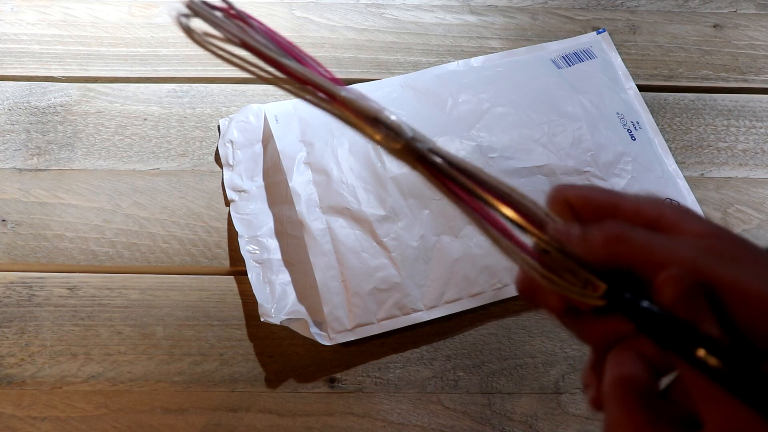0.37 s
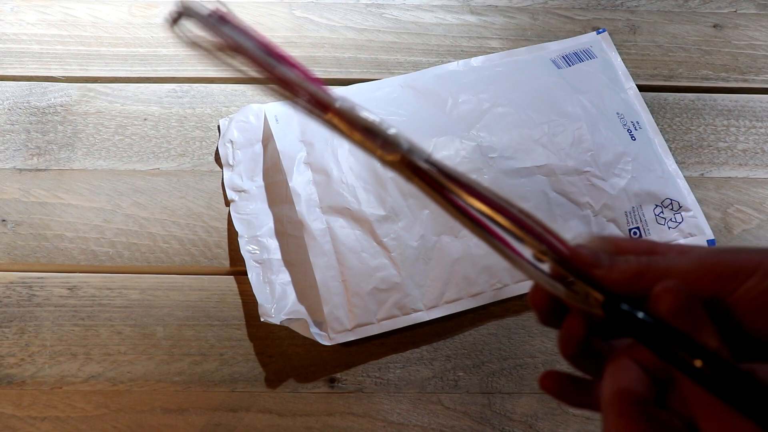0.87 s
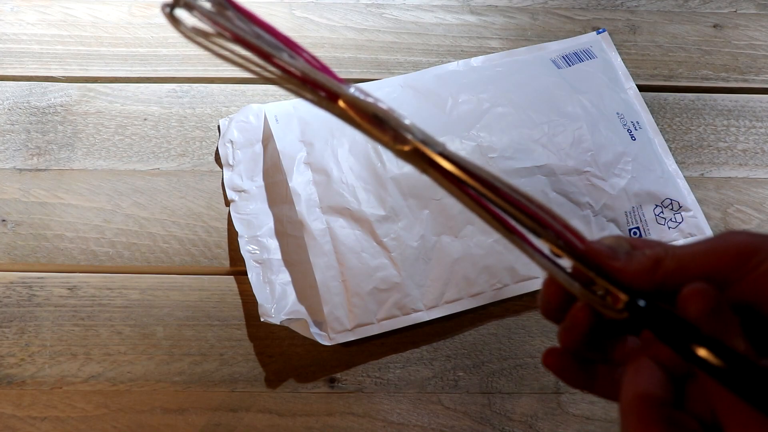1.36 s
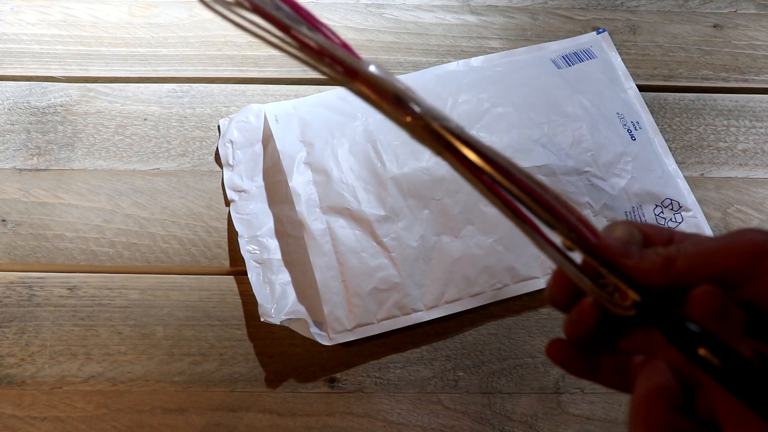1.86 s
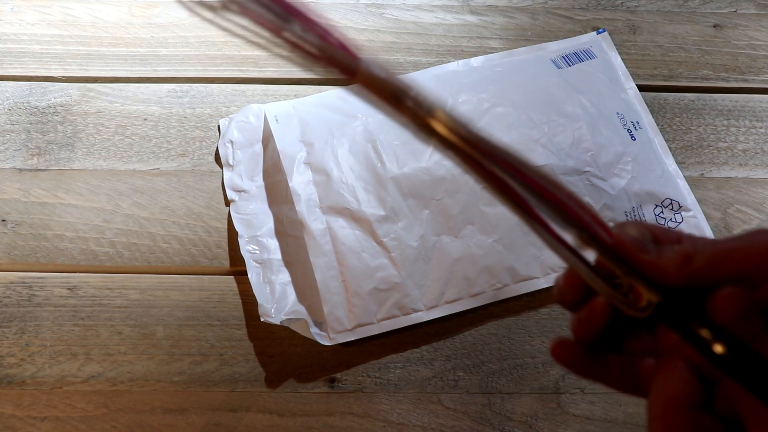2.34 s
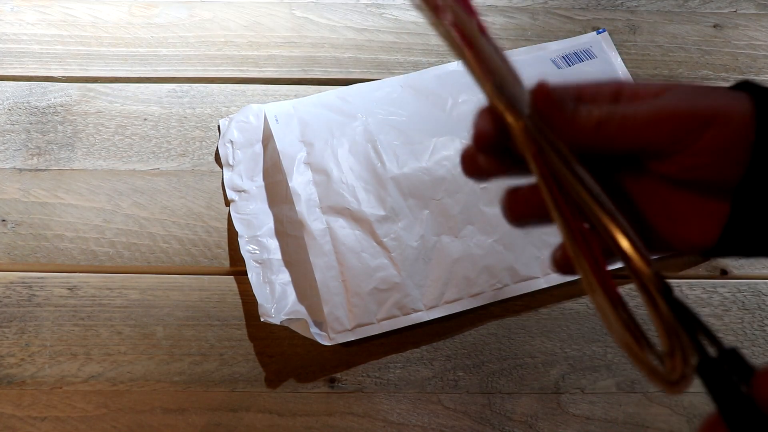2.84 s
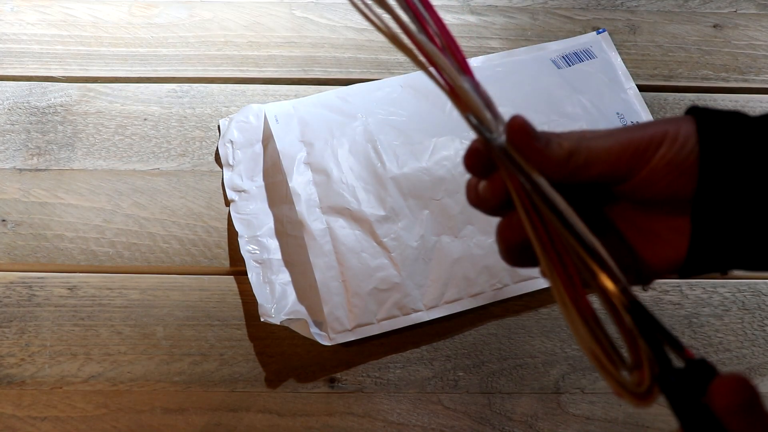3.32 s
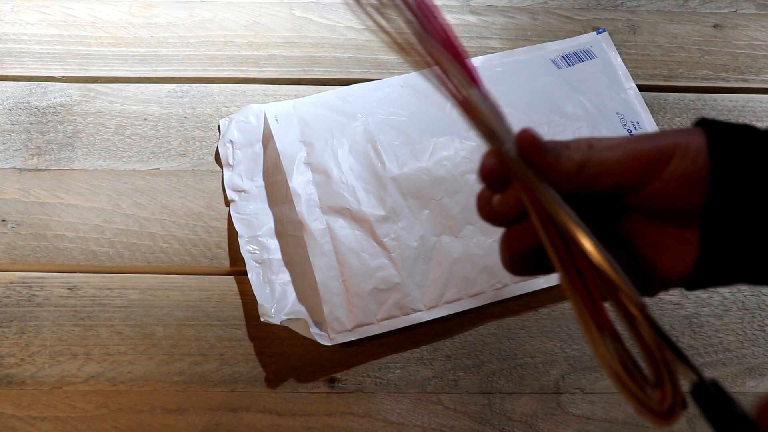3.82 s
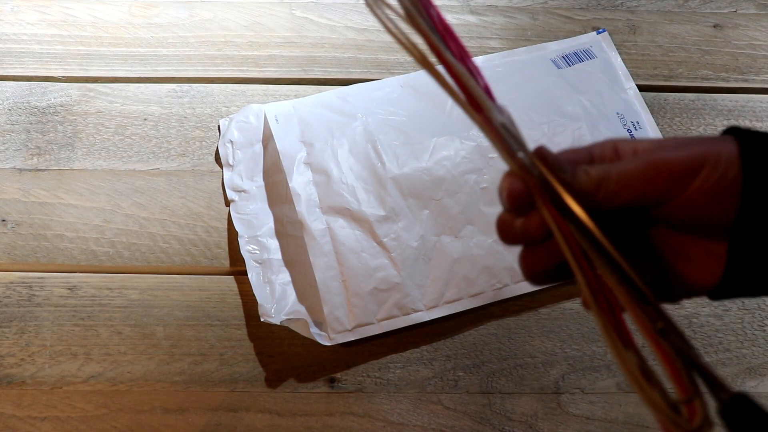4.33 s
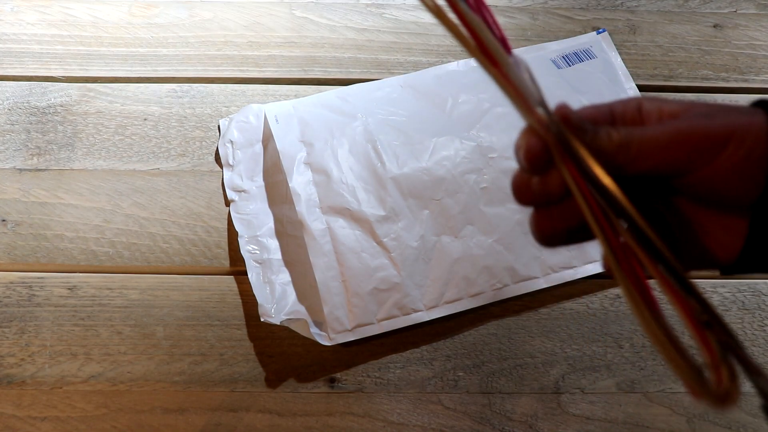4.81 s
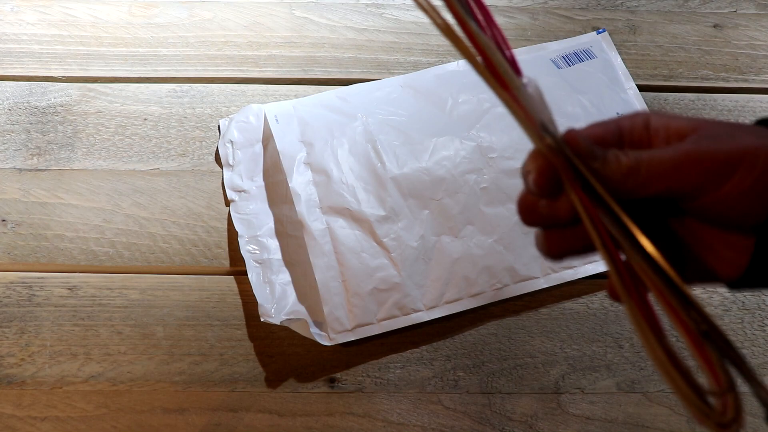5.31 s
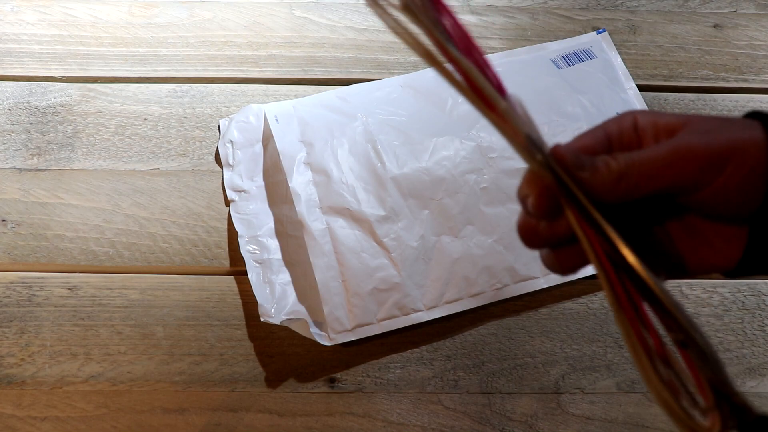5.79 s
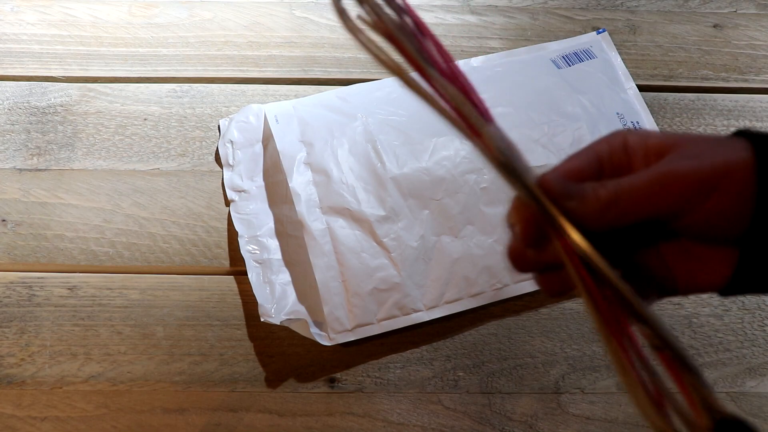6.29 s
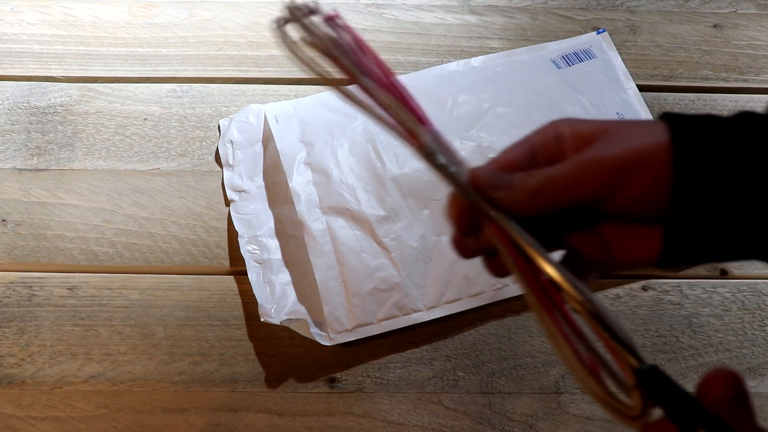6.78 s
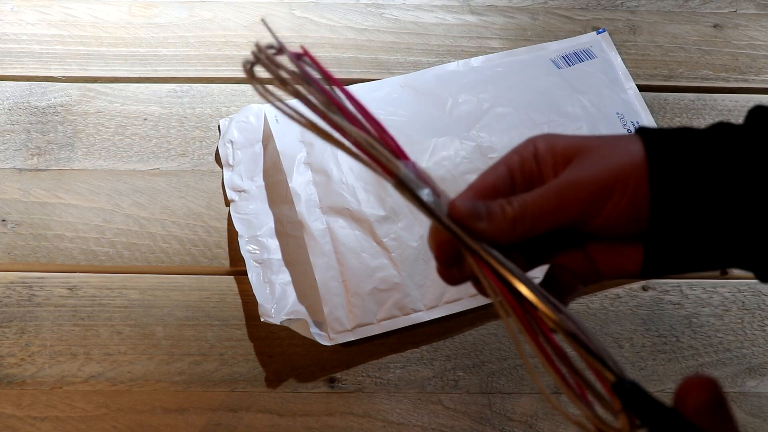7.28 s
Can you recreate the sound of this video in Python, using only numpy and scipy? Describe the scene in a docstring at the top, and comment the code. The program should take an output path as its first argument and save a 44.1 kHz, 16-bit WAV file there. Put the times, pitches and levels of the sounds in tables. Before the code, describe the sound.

Fingers pick and peel sticky tape from a cord bundle up close, with irregular crisp snaps, ticks and fine crackling over faint room hum.

```python
"""Fingers pick at adhesive tape round a bundle of cord on a wooden table, close to a camera.
A low unsteady hum and room rumble (tone and shaped noise) run throughout. From the start slow pulls swell
a fine crackle of film and skin (clumped random slips); fingertips slide softly (resonant noise swells).
Then the glue lets go in snaps and short tears (slip volleys ringing film and cord), and the cord knocks;
a small room answers (decaying noise). Near the end the camera's support is bumped (decaying low sines)."""
import sys
import numpy as np
from scipy import signal
from scipy.fft import rfft, irfft, next_fast_len
from scipy.io import wavfile
from scipy.ndimage import map_coordinates

SR = 44100
rng = np.random.default_rng(int(sys.argv[2]) if len(sys.argv) > 2 else 0)


def makeup_ratio(level_db):
    """Linear amplitude ratio for a level in decibels (20 dB per factor of ten)."""
    decades = np.asarray(level_db, float) / 20
    return 10 ** decades


def store_wav(level_fs):
    """Save 16-bit WAV to argv[1]."""
    pcm = np.round(np.clip(np.atleast_2d(level_fs), -1, 1) * 32767)
    wavfile.write(sys.argv[1], SR, pcm.T.astype(np.int16))


N = 337362

# Releases of the glue. Each row: start in seconds, energy of the film's ring in dB, ring pitch in Hz,
# crack over the ring in dB, nominal length of the tear in ms.
SNAPS = [(.4451, -21.5, 2950, -1, .46), (.4514, -14.5, 3150, -7, 8.4), (0.463, -24, 3000, -8, 3.7),
         (.477, -11.5, 3200, -13, 0.92), (0.4918, -12.5, 2700, -14, 6.7), (.5006, -19.5, 2780, -15, 6.7),
         (0.7501, -11, 2800, -15.5, 6.7), (0.7565, -14, 2630, -13, 0.96), (0.971, -20, 3140, -8, 1.7),
         (1.0186, -23.5, 3000, -17, 2.7), (1.0517, -22, 3100, -7, 3.7), (1.1007, -29, 3250, -2, .6),
         (1.1262, -19, 3200, -1, 2.5), (1.1366, 1.1, 2650, -9, 0.93), (1.1548, -22, 3220, 0, 1.6),
         (1.2, -18.5, 3200, -8, 0.85), (1.3606, -11, 2790, -26, 1.9), (1.5008, -28.5, 3430, 9, 4),
         (1.549, -26, 2290, -4, 1.4), (1.595, -29.5, 3020, -16, 0.96), (1.6788, -19.5, 2880, -1, 2.4),
         (1.6806, -20, 2470, -3, 3.2), (1.6925, -11.5, 2750, -7.5, 1.2), (1.7033, -7, 2800, -13, 1.2),
         (1.7177, -14.5, 2760, -1.7, 0.41), (1.8618, 2, 2870, -6.5, 5.1), (1.8739, -15, 3100, 3, .26),
         (1.895, -12, 2940, -7.5, 2.2), (1.9823, -2.5, 4280, -4.5, 0.37), (2.045, -31, 2900, -7, .8),
         (2.0696, -24, 2980, -17, 0.55), (2.1025, -12.5, 3050, -18, 0.72), (2.1042, -8, 2820, -5.5, 2),
         (2.109, -11, 2760, -6, 4), (2.2122, -14, 2700, -8, 2.3), (2.2475, -10, 3020, -11.5, .28),
         (2.3313, -26, 2640, 1, 0.52), (2.3517, -32, 3780, 8, .2), (2.4273, -29, 3210, 2.5, 4.1),
         (2.4518, -24, 2900, -6, .71), (2.4724, -17.5, 3220, -35, 0.43), (2.6109, -11, 2240, -26, 6.8),
         (2.618, -16, 2520, -28, 1.5), (2.7784, -13.5, 3030, -5.5, 5.9), (2.795, -15.5, 2560, -10, 0.32),
         (2.8435, -18.5, 2450, -33, 0.52), (2.8693, -13, 2880, -27, 1.8), (2.8887, -27, 3090, 1, 9),
         (2.9056, -21, 3430, -1, .97), (2.9341, -6, 3200, -11.5, .55), (2.941, -14, 3040, -6, 3.8),
         (2.948, -7, 3020, -17, 2), (2.98, -1.5, 3300, -6, 1.9), (3.001, -5, 3250, -7, 0.41),
         (3.0047, -1.5, 3150, -2, 1.9), (3.048, -12.5, 3240, 5.5, 0.52), (3.0572, -14, 2860, -24, 2),
         (3.0733, 2.5, 3130, -7, .21), (3.097, -4, 2880, -4, 0.83), (3.0997, -0.5, 3140, -3, 4.5),
         (3.1062, -12, 3200, -3, 3.2), (3.1227, -9, 3300, -21, 5), (3.1335, -8, 3200, -11, 1.5),
         (3.138, -11, 2860, -3, 2.1), (3.1515, -11, 3330, -12, 2.3), (3.1698, -1, 3340, -8.5, 2.6),
         (3.185, -14, 2560, -13, 3.3), (3.2105, -17.5, 2810, -7, 1.8), (3.265, -23.5, 2600, -10, 0.66),
         (3.2943, -25, 3600, -2.5, .3), (3.3094, -20.5, 3200, -1, 0.3), (3.3531, -27.5, 3600, -1, .32),
         (3.3973, -22, 3330, 6, .3), (3.4283, -16.5, 2520, -5, 4.2), (3.4707, -39, 3350, 19, .27),
         (3.4746, -20.5, 3720, 6.5, 0.41), (3.5095, -10.5, 2950, -11, 2.6), (3.5533, -10.5, 3060, -9.5, .3),
         (3.5786, -13.5, 3150, -11, 9.1), (3.6081, -7, 2940, -13.5, .38), (3.617, -5.5, 3040, -24, 1.5),
         (3.6526, -16, 3700, 3.5, 0.87), (3.6696, -9.5, 3050, -9, 6), (3.675, -7, 3160, -2, 0.67),
         (3.6954, -9.5, 3000, -35, 1.4), (3.825, -19.5, 3150, -4, 3.9), (3.84, -6.5, 3260, 0, 1.5),
         (3.8644, -16, 3200, -3, 7.9), (3.886, -18, 3120, -9, 3.6), (3.9273, -13, 3180, -9, .32),
         (3.972, -24, 3060, -1, 0.91), (4.0068, -24, 3100, -1, .32), (4.053, -16.5, 3100, -10, 5.2),
         (4.229, -28, 3200, 1, 1.8), (4.261, -27.5, 3300, -1, .6), (4.3264, -15, 2940, -8, 1.4),
         (4.4, -20, 3050, -2, 4.2), (4.413, -28, 3410, 11, .25), (4.4162, 7, 2730, -15, 0.41),
         (4.4446, -18, 2860, -22, 6), (4.5376, -8, 3050, -1, 2.2), (4.548, -12, 3140, -0.5, 1.7),
         (4.6322, -27, 3060, 9, 0.61), (4.6435, -14, 3230, -9, 0.78), (4.757, -35, 3650, 4, .4),
         (4.809, -23.5, 2730, -6.5, 2.1), (4.825, -23, 3030, -8, 1.5), (4.844, -24, 2700, -14, .8),
         (4.8694, -9.5, 3580, -1, .99), (5.05, -26.5, 3200, -11, .4), (5.102, -31.5, 2620, -4, 0.82),
         (5.12, -27.5, 3200, -5, .8), (5.124, -14, 3030, -9, 9.1), (5.137, -20, 3080, -5, 2.7),
         (5.187, -27.5, 2340, -7, 1), (5.2418, -13.5, 3230, -6, 0.47), (5.282, 1, 2870, -9, 0.6),
         (5.421, -17.5, 4220, -7.5, 1.8), (5.4495, -26, 3500, -2, .8), (5.4931, -13.5, 3400, 2, .3),
         (5.5034, -11, 3280, -2.5, .28), (5.5172, -29, 3830, 1.5, .4), (5.5343, -12, 2850, -2.5, 0.29),
         (5.574, -20, 3180, -9, 2.8), (5.7571, -18, 2650, -6.5, 4.2), (5.7881, -26, 3500, -0.5, .33),
         (5.824, -25, 2410, -6, 0.67), (5.8873, -16.5, 2870, -12.5, 2), (5.9239, 5.5, 3100, -10.5, 3.7),
         (5.936, -11, 2900, -6, 2.9), (5.978, -1.5, 3530, 2, .17), (5.959, -21, 2960, 5, 3.1),
         (5.9898, -4, 3000, 2.1, 3.9), (6.0035, -12.5, 3150, -7, 6.4), (6.1, -24, 2520, -4, 4.5),
         (6.1286, -20.5, 2920, 0.5, 2.5), (6.1566, -18, 3470, -2, 13), (6.17, -23, 3200, -6, 1.5),
         (6.176, -15, 3340, -2.5, 1.3), (6.2256, -20, 3400, 1, 3), (6.2715, -17, 3460, -20, 2.4),
         (6.3529, -3, 3320, -10, 4), (6.3769, -9, 3210, -10.5, 2.5), (6.3837, -11, 3470, -9, 2.6),
         (6.3903, -17, 3470, -11, 4.1), (6.401, -10, 2960, -13, 0.93), (6.5288, -22.5, 3070, -12, 1.5),
         (6.5357, -27, 3390, 5, .69), (6.542, -15.5, 4170, -3.5, 1.6), (6.645, -17.5, 3070, -9, 7.5),
         (6.665, -29.5, 3340, 4, 1.1), (6.6814, -9.5, 3620, -21, 0.53), (6.7407, -23, 3320, -5, 1.1),
         (6.7449, -3.5, 3000, -9, 3.1), (6.7664, -18, 3140, -3, 2.5), (6.931, -8, 3170, -13, 0.41),
         (6.945, -19, 3450, 0.5, .27), (6.9683, -7.5, 3400, -13.5, 1.4), (7.075, -30, 3400, -9, 1.5),
         (7.083, -29.5, 2500, -14, 1.4), (7.1395, -12, 2820, -17, 4.5), (7.156, -25, 3000, -12, 3),
         (7.1829, -6.5, 2970, -6.5, 6.8), (7.2024, -16.5, 3540, -6, 3.9), (7.2176, -13.5, 3370, -0.5, 2.6),
         (7.319, -38, 3200, -18, 1.5), (7.3325, -3.5, 2800, -16, 0.31), (7.343, -16, 3460, -7.5, 3.3),
         (7.4251, -14, 3070, -6.5, 9.9), (7.481, -21, 2550, -8, 4), (7.528, -29.5, 3140, 9.5, 1.1),
         (7.5724, 0.9, 3440, -.5, 2.1), (7.5809, -19, 2940, 5, 1), (7.6139, -4.5, 2960, 1, 1.8),
         (7.617, -5, 3670, -7, 2.1), (7.6288, 8, 3250, -5, 0.8), (7.6444, -21, 3380, 12, 1.5)]
# Colour of the film's fizz and crack. Each row: frequency in Hz, relative density in dB per Hz.
FIZZ = [(3000, -63.5), (4800, 15.5), (8000, 14), (11000, 8), (12700, 12.5), (15500, 4.5), (16500, -12),
        (17000, -75.5)]
# Colour of the cord's thud and rubbing. Each row: frequency in Hz, relative density in dB per Hz.
CORD = [(120, -73.5), (250, 3), (500, 1), (800, 7.5), (1300, 13), (1900, 10.5), (3000, -43.5)]


def unit(x):
    """Scaled to rms 1."""
    return x / np.sqrt(np.mean(x ** 2) + 1e-20)


def along(points, hz):
    """Interpolates (Hz, value) points on a log frequency axis."""
    f, v = np.transpose(points)
    return np.interp(np.log(hz + 1), np.log(f + 1), v)


def wobble(rate_hz):
    """Smooth random curve through rate_hz normal knots a second."""
    knots = rng.standard_normal(int(N * rate_hz / SR) + 4)
    return map_coordinates(knots, [np.arange(N) * rate_hz / SR])


def kernel(spectrum, size=4096):
    """Causal minimum-phase impulse response of this colour, by folding the cepstrum."""
    gain = makeup_ratio(along(spectrum, np.fft.rfftfreq(size, 1 / SR)))
    cepstrum = irfft(np.log(gain + 1e-4))
    cepstrum[1:size // 2] *= 2
    cepstrum[size // 2 + 1:] = 0
    return irfft(np.exp(rfft(cepstrum)))[:size // 4]


def coloured(spectrum):
    """Steady noise of this colour, rms 1."""
    m = next_fast_len(N)
    gain = makeup_ratio(along(spectrum, np.fft.rfftfreq(m, 1 / SR)))
    return unit(irfft(rfft(rng.standard_normal(m)) * gain, m)[:N])


def background():
    """Room tone as drifting coloured noise, and a hum unsteady in pitch and level."""
    # Room tone. Each row: frequency in Hz, relative density in dB per Hz.
    air_colour = [(15, -48), (25, -15), (45, -17.5), (88, -14), (115, -7), (330, -19), (550, -22.5),
                  (1500, -30), (6000, -34.5), (15000, -36.5), (16000, -65)]
    hum_hz = 88.8 + 2.71 * wobble(8.3)
    hum_rms_db = -59.5 + 0.9 * wobble(15)
    hum = np.sqrt(2) * makeup_ratio(hum_rms_db) * np.sin(2 * np.pi * np.cumsum(hum_hz) / SR)
    air_rms_db = -58.5 + 1.2 * wobble(2.5)
    return makeup_ratio(air_rms_db) * coloured(air_colour) + hum


def film(hz):
    """Short ring of a taut patch of film: a single resonance at its pitch, with skirts falling away on either
    side."""
    # Each row: multiple of the pitch, relative level in dB.
    ring_shape = [(.2, -56), (.3, -36.5), (0.499, -10), (0.719, 2.5), (1.002, 8.5), (1.349, -2.5),
                  (2, -42.5), (3, -72)]
    return kernel([(k * hz, db) for k, db in ring_shape])


def activity():
    """Gains of film crackle, fizz and rubbing: pulls swell and fade, each snap leaves a dying crackle."""
    # Slow pulls peeling a stretch of tape. Each row: peak in seconds, film crackle in dB,
    # time to fall 10 dB in seconds (5 ms at least), fizz over the crackle in dB, rubbing over it in dB.
    pull_rows = [(.008, -46, 0.0356, -14, -24), (.285, -48.5, 0, -6, -17), (.35, -51, 0.04, -14, -9.5),
                 (.5, -50, 0.05, -7.5, -7.5), (.64, -49, 0.06, -13, -13), (.705, -54, 0.07, -14, -7),
                 (.82, -50.5, 0.12, -11.5, -7.5), (.9, -55, 0.18, -14.5, -6), (1.01, -46, 0.07, -10, -7.5),
                 (1.432, -47.5, -0.18, -10, -13), (1.46, -47, -0.1, -11, -11), (1.52, -58, -0.55, -4, -5),
                 (1.59, -66, 0.26, -17, -7), (1.7, -49, -0.01, 4, -20), (2.06, -56.5, 0.24, -5.5, -20),
                 (2.3, -52, 0.02, -3, -10.5), (2.446, -50.5, 0.08, -5, -10.5),
                 (2.489, -49.5, 0.07, -11.5, -12), (2.566, -47, 0.05, -8.5, -6),
                 (2.606, -43, 0.01, -19, -12), (2.648, -47, -0.1, -6, -1), (2.8, -58.5, 0.23, -19, -9),
                 (2.88, -45.5, 0.11, -9, -12), (2.962, -41.5, 0.0153, -12, -10),
                 (3.12, -43.5, 0.0455, -3, -15), (3.43, -51.5, 0.11, -13, -13), (3.6, -50.5, 0.09, -12, -7),
                 (3.85, -46, -0.21, 1, -1), (4.07, -61.5, 0.5, -4, -6), (4.24, -64, 1, -2.5, -30),
                 (4.34, -46, -0.05, -12, -16), (4.47, -48.5, 0.08, -18, -29), (4.51, -44.5, -0.09, 0, -20),
                 (4.559, -38.5, 0.0119, -6.5, -14), (4.942, -39, 0.0044, -4.5, -17),
                 (5.14, -63.5, -0.6, -6, -4), (5.4, -63.5, 4.5, -14, -13), (5.51, -60.5, 0.8, -6.5, -11),
                 (5.83, -54.5, .04, -9, -13), (5.942, -45.5, .018, -4, -16), (6.01, -47, 0.1, -5, -22),
                 (6.138, -40.5, 0.0146, -4, -14), (6.27, -46, -0.02, -7, -2.5), (6.4, -43, -0.14, 0, -13),
                 (6.568, -49.5, 0.05, -4, -9), (6.69, -56, -0.02, -12, -25), (6.95, -72, 0.05, 12, -16),
                 (7.05, -64.5, 0.6, -17, -8), (7.2, -46, -0.01, 1, -23), (7.352, -53, 0.05, 0.5, -6),
                 (7.46, -57.5, -0.1, -9, -9), (7.629, -42.5, 0.0451, -7, -9.5)]
    # Holding on without pulling: film, fizz and rubbing in dB.
    holding_on_db = (-76.5, -77, -98.5)
    rise_share = 0.83  # time to rise 10 dB, over the fall time
    hard_db, hold_per_db = -45.5, 0.2925  # louder pulls hold their peak: rise or fall times per dB above
    after_db, after_t60_s = -50, 0.51  # crackle left by a snap, over the snap's energy
    after_fizz_db, after_rub_db = -10.5, -16  # over that crackle

    t = np.arange(0, N, 32) / SR
    peak_s, film_db, fall_s, fizz_db, rub_db = np.transpose(pull_rows)[:, :, None]
    late = (t - peak_s) / np.maximum(fall_s, .005)
    hold = hold_per_db * np.maximum(film_db - hard_db, 0)
    distance = np.where(late > 0, late, -late / rise_share)
    pull_db = film_db - 10 * np.maximum(distance - hold, 0)

    snap_s, snap_db = np.transpose(SNAPS)[:2, :, None]
    dying_db = snap_db + after_db - 60 * np.abs(t - snap_s) / after_t60_s
    after_power = np.sum((t > snap_s) * makeup_ratio(dying_db) ** 2, axis=0)

    gains = []
    for rest_db, pull_over_db, after_over_db in zip(
            holding_on_db, (0, fizz_db, rub_db), (0, after_fizz_db, after_rub_db)):
        pull_power = np.sum(makeup_ratio(pull_db + pull_over_db) ** 2, axis=0)
        power = makeup_ratio(rest_db) ** 2 + pull_power + after_power * makeup_ratio(after_over_db) ** 2
        gains.append(np.interp(np.arange(N) / SR, t, np.sqrt(power)))
    return gains


def crackle():
    """Thousands of tiny slips a second, clumped and uneven, over the smooth rubbing of skin on film and cord."""
    film_gain, fizz_gain, rub_gain = activity()
    size_db = np.minimum(4 * rng.exponential(size=N) + 5 * wobble(90) + 3.7 * wobble(250), 21)
    hits = rng.random(N) < 4000 / SR  # 4000 slips a second on average
    slips = unit(hits * rng.standard_normal(N) * makeup_ratio(size_db))
    skin = rng.standard_normal((2, N))

    def heard(x, k):
        """Noise through a resonance, rms 1."""
        return unit(signal.fftconvolve(x, k)[:N])

    rustle = slips + (0.58 + film_gain / makeup_ratio(-32)) * skin[0]  # a hard pull blurs into hiss
    rub = heard(0.59 * slips + skin[1] * makeup_ratio(3.0 * wobble(30)), kernel(CORD))
    large_patches = heard(rustle, film(3200))
    # smaller patches slip on their own: the rustle reversed in time
    small_patches = makeup_ratio(-13) * heard(rustle[::-1], film(5380))
    fizz = heard(rustle, kernel(FIZZ))
    return film_gain * (large_patches + small_patches) + fizz_gain * fizz + rub_gain * rub


def room(x):
    """Each band of the echo dies at its own speed; the hands move, so the tail is new every tenth of a second."""
    # Each row: frequency in Hz, t60 in seconds.
    echo_t60 = [(300, 0.19), (1500, 0.12), (3200, 0.12), (6000, 0.15), (15000, 0.057)]
    step, out = SR // 10, np.zeros(N + SR)
    for start in range(0, N, step):
        hz, t, z = signal.stft(rng.standard_normal(SR // 2), SR, nperseg=256)
        decay_db = -60 * t / along(echo_t60, hz)[:, None]
        tail = signal.istft(z * makeup_ratio(decay_db), SR, nperseg=256)[1]
        wet = signal.fftconvolve(x[start:start + step], tail / np.linalg.norm(tail))
        out[start + 60:][:len(wet)] += wet  # delayed by 60 samples
    return out[:N]


def slides():
    """A fingertip slides softly along the cord: short swells of noise in a soft resonance."""
    # Each row: start in seconds, length in seconds, rms before the swell in dB, pitch in Hz.
    slide_rows = [(0.048, 0.063, -57.5, 930), (2.039, 0.063, -60, 1200), (5.047, .05, -59.5, 1300),
                  (5.2, .04, -59, 2000), (6.052, .05, -59, 890), (7.043, .06, -61, 1300)]
    out = np.zeros(N + SR)
    for (start_s, length_s, db, hz), noise in zip(slide_rows, rng.standard_normal((len(slide_rows), SR // 4))):
        u = np.clip(np.arange(len(noise)) / SR / length_s, 0, 1)
        swell = np.sin(np.pi * u ** .7)
        out[round(start_s * SR):][:len(u)] += makeup_ratio(db) * unit(np.convolve(noise, film(hz))[:len(u)]) * swell
    return out[:N]


def snaps():
    """A first slip and a volley of others ring the taut film, thud in the cord and crack."""
    t = np.arange(2048) / SR
    thud, crack, out = kernel(CORD), kernel(FIZZ), np.zeros(N + 2 * len(t))
    for (start_s, ring_db, hz, crack_db, tear_ms), chance in zip(
            SNAPS, rng.standard_normal((len(SNAPS), 2, len(t)))):
        u = 1000 * t / np.maximum(tear_ms - .35, .02)
        slips = chance[0] * (chance[1] > 1.3)  # about one sample in ten
        volley = slips * (u + 0.19) * np.exp(-1.4 * u ** 1.08)
        volley[0] = 1.54 / (1 + tear_ms / 1.2)  # a long tear starts gently
        bounce = 8 + int(6 * abs(chance[0, 0]))  # samples until the table's echo
        volley[bounce:] += .5 * volley[:-bounce].copy()
        # thud over the ring: base, rise per ms of tear, random scatter
        thud_db = -26.5 + 1.53 * tear_ms - 2 * chance[1, 0]
        levels_db = (ring_db, ring_db + thud_db, ring_db + crack_db)
        for db, k in zip(levels_db, (film(hz), thud, crack)):
            part = signal.fftconvolve(volley, k)[:len(t)]
            out[round(start_s * SR):][:len(t)] += makeup_ratio(db) * part / np.linalg.norm(part)
    return out[:N]


def knocks():
    """The bundle of cord is knocked: quick noise contacts sound the cord alone."""
    # Each row: start in seconds, energy in dB.
    knock_rows = [(0.7513, -24), (0.758, -20), (0.969, -26.5), (1.8628, -22), (1.895, -24), (2.1112, -19),
                  (2.7941, -25), (2.948, -20), (3.057, -26), (3.0735, -9.5), (3.0965, -21), (3.1681, -21.5),
                  (3.186, -23), (3.4296, -24.5), (4.5406, -32), (5.137, -28), (5.422, -29.5),
                  (5.7581, -21.5), (5.9897, -19), (6.2253, -26), (7.218, -24.5), (7.505, -33.5),
                  (7.5866, -21), (7.6133, -7.5), (7.6288, -5)]
    out, thud = np.zeros(N + SR), kernel(CORD)
    for (start_s, db), chance in zip(knock_rows, rng.standard_normal((len(knock_rows), 256))):
        contact = chance * np.exp(-np.arange(len(chance)) / SR / 0.00055)
        knock = np.convolve(contact, thud)
        out[round(start_s * SR):][:len(knock)] += makeup_ratio(db) * knock / np.linalg.norm(knock)
    return out[:N]


def bump():
    """Low shaking carried through the camera's support: each jolt is a decaying sine with a soft onset."""
    # Each row: start in seconds, level before onset and decay in dB, pitch in Hz, t60 in seconds.
    jolt_rows = [(7.317, -50, 105, 0.18), (7.345, -34, 83, 0.091), (7.335, -45, 23.8, 0.42),
                 (7.383, -34, 95, 0.076), (7.437, -41, 87.5, 0.18), (7.475, -40.5, 22, 0.48),
                 (7.505, -46, 60, 0.098), (7.528, -48, 109, 0.088)]
    t, out = np.arange(SR // 2) / SR, np.zeros(N + SR)
    for start_s, db, hz, t60_s in jolt_rows:
        onset = 1 - np.exp(-t / 0.0011)
        out[round(start_s * SR):][:len(t)] -= makeup_ratio(db - 60 * t / t60_s) * np.sin(2 * np.pi * hz * t) * onset
    return out[:N]


def scene():
    """Everything arrives from the front, alike in both channels."""
    tape = snaps() + knocks() + slides() + crackle()
    mid = tape + makeup_ratio(-13.0) * room(tape) + background() + bump()
    return np.array([mid, mid])


def top_cut(x):
    """Nothing passes above the cut-off."""
    return signal.sosfilt(signal.butter(12, 16980, fs=SR, output="sos"), x)


def record(dry):
    """The two channels differ by a faint noise of opposite sign; the sum clips at full scale."""
    # Self-noise. Each row: frequency in Hz, relative density in dB per Hz.
    self_noise_colour = [(18, -31), (30, -9.5), (200, -19.5), (1000, -25), (3000, -30), (15400, -27.5),
                         (16000, -68)]
    side = makeup_ratio(-69.0) * coloured(self_noise_colour)
    mix = np.clip(dry + [side, -side], -1, 1)
    return top_cut(mix)


dry = scene()
out = record(dry)
store_wav(out)
```